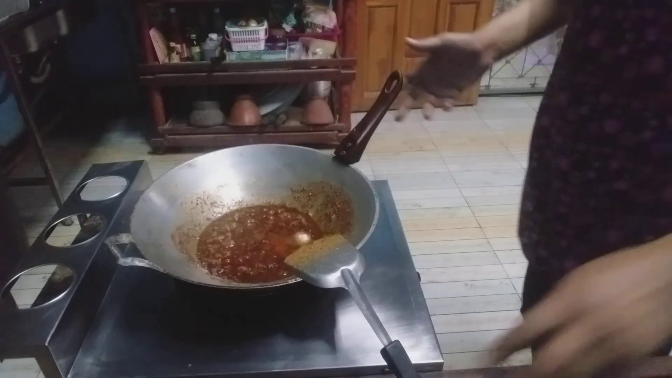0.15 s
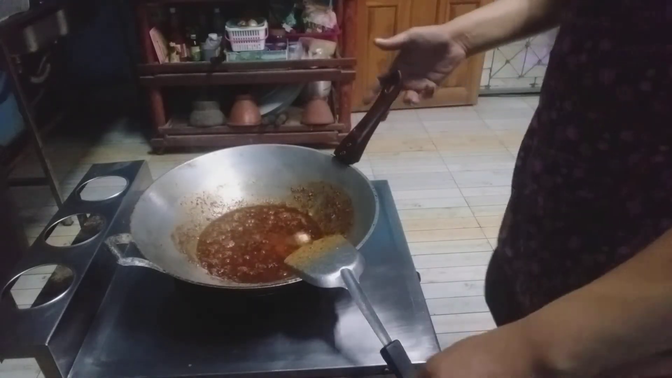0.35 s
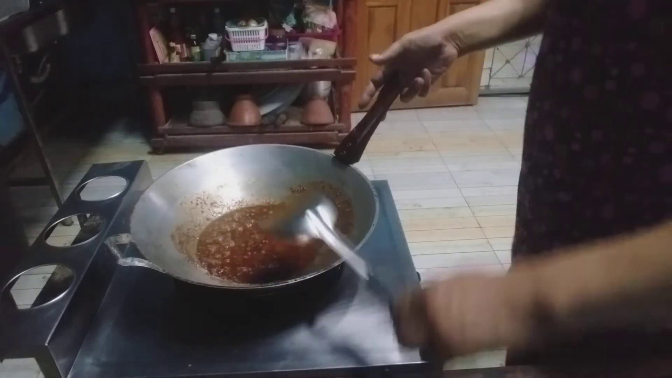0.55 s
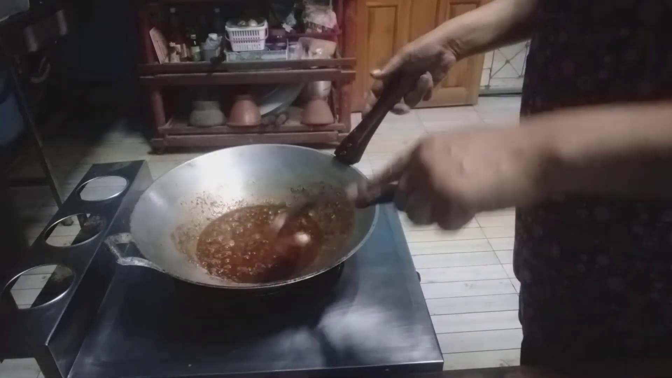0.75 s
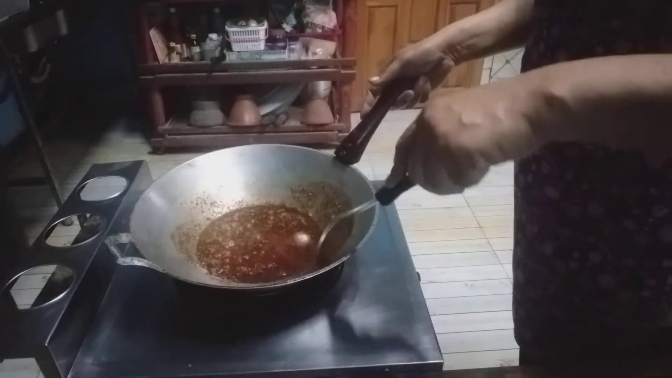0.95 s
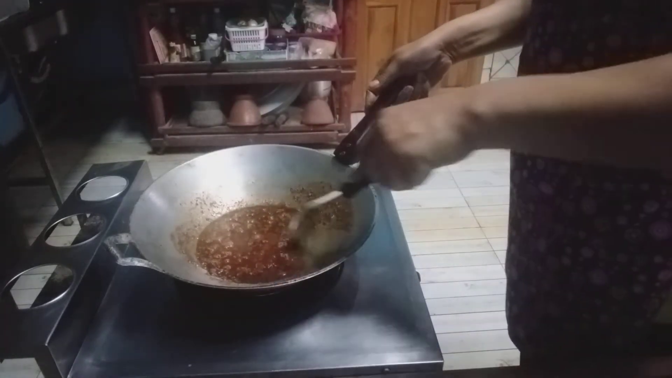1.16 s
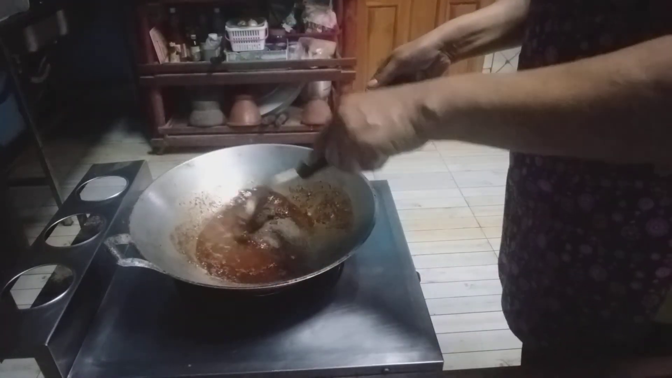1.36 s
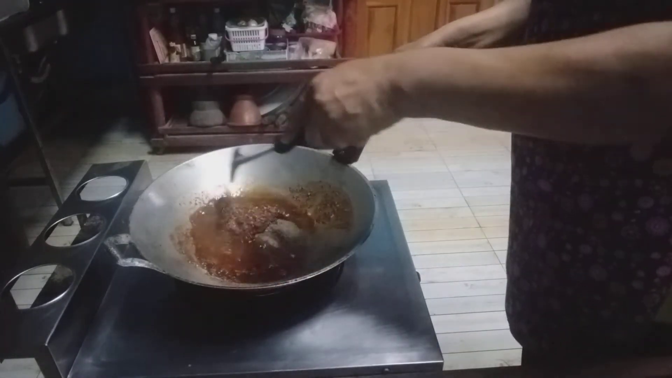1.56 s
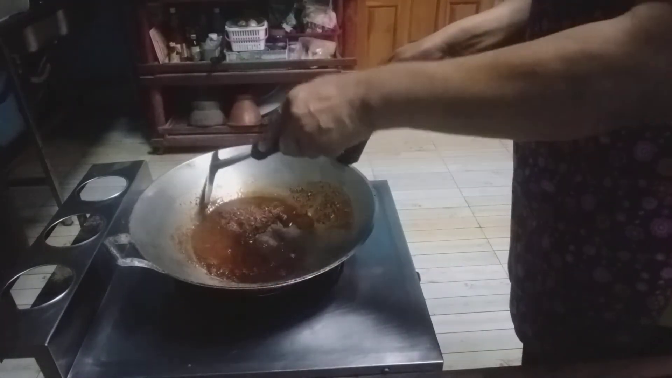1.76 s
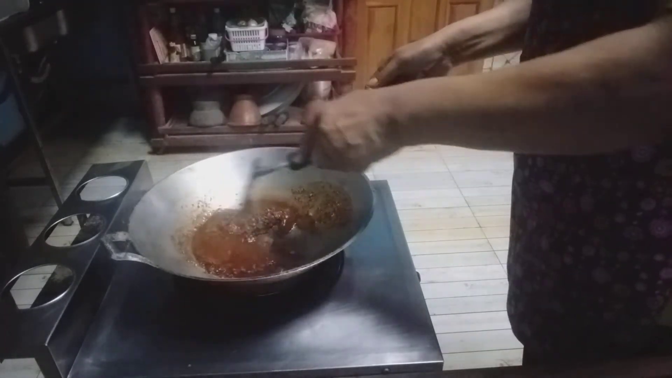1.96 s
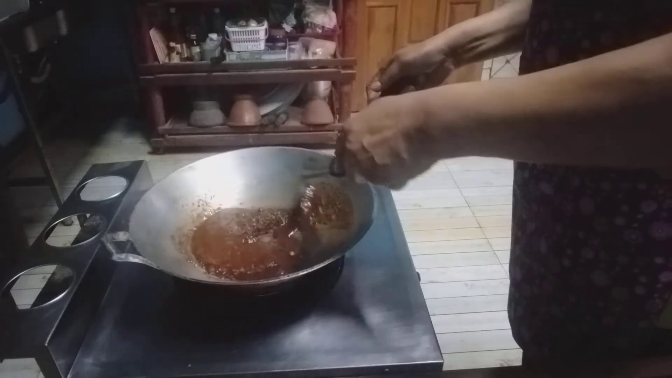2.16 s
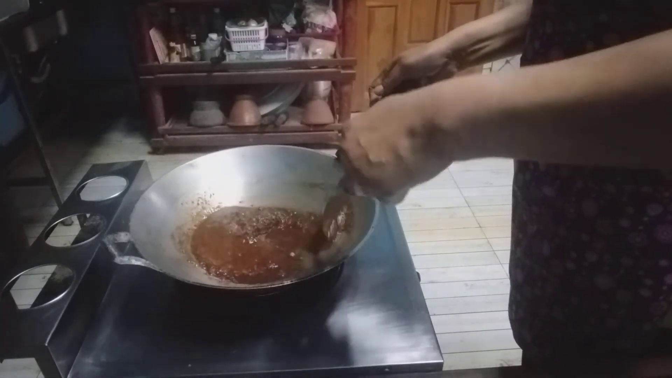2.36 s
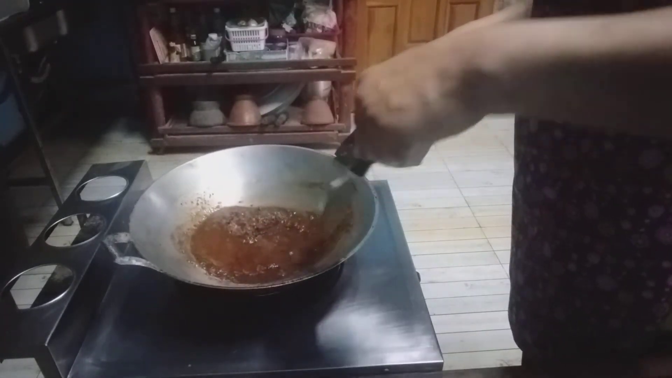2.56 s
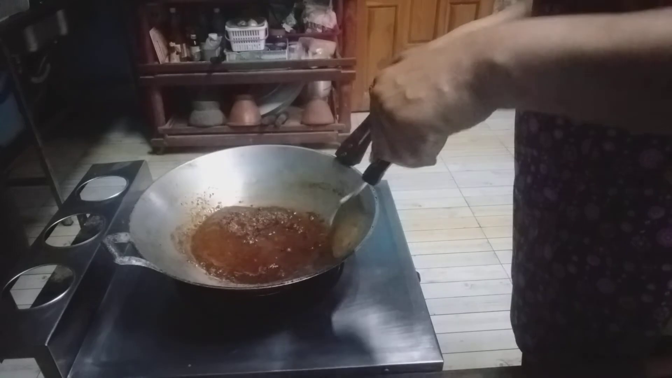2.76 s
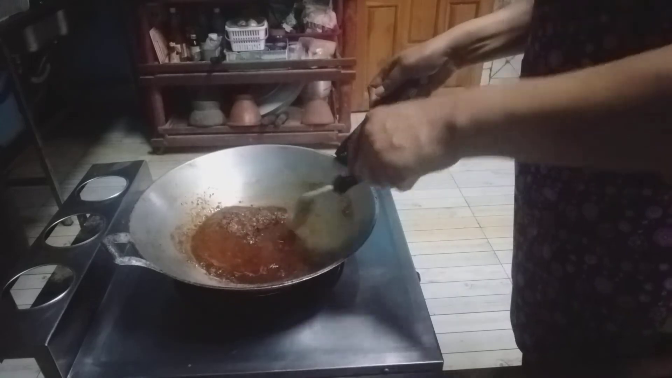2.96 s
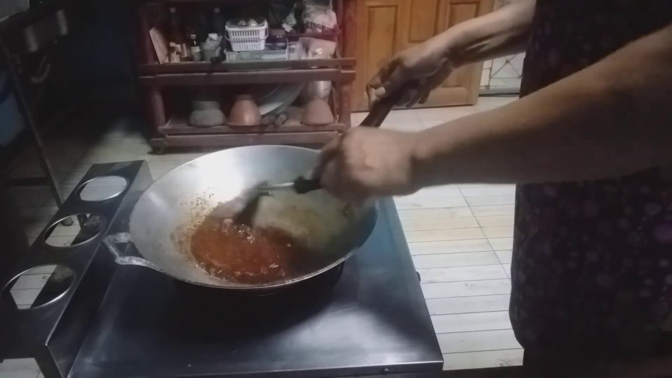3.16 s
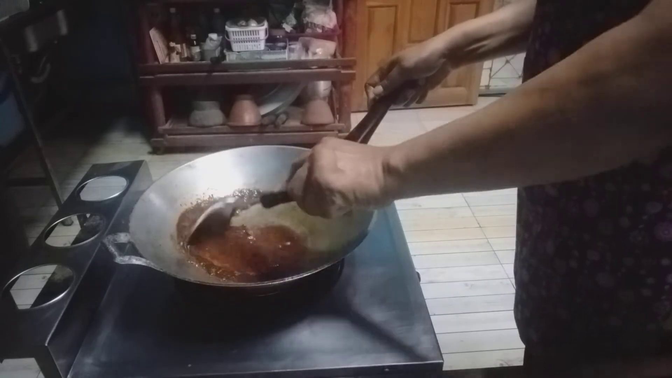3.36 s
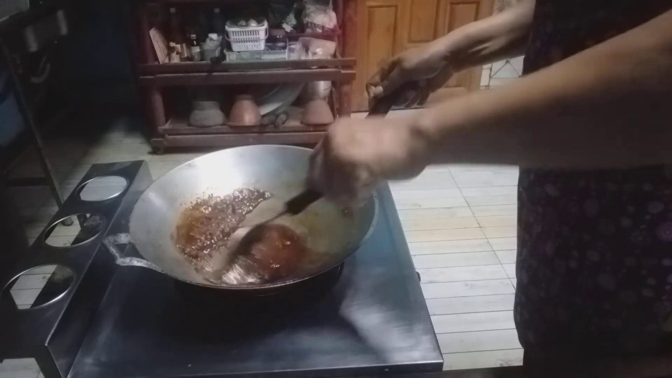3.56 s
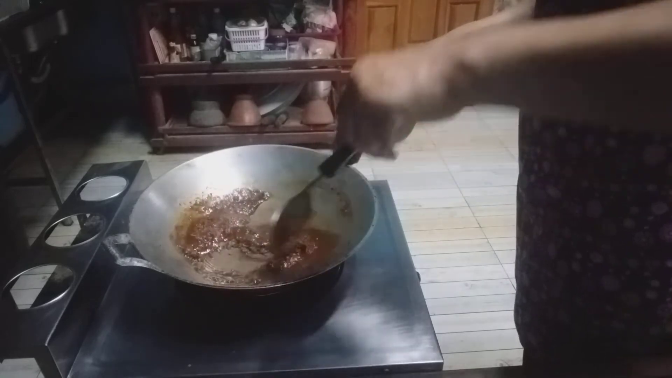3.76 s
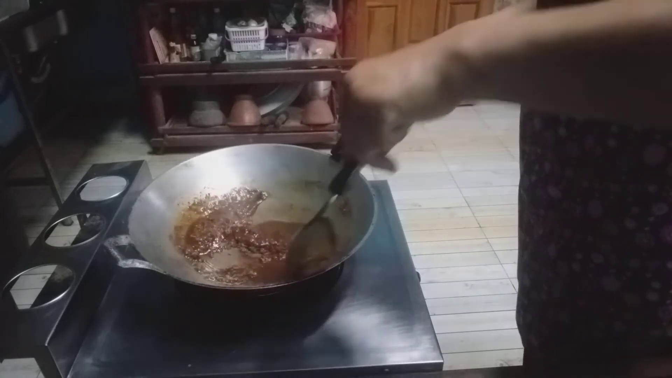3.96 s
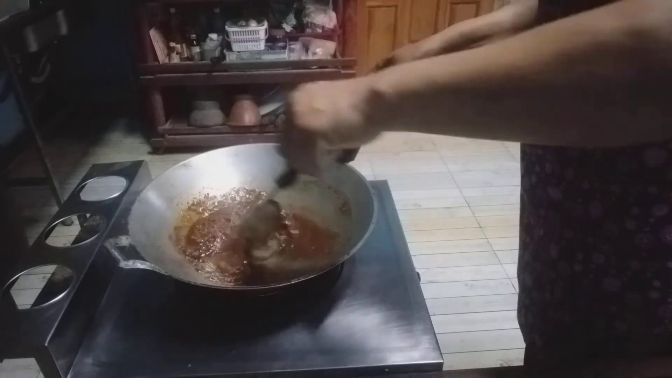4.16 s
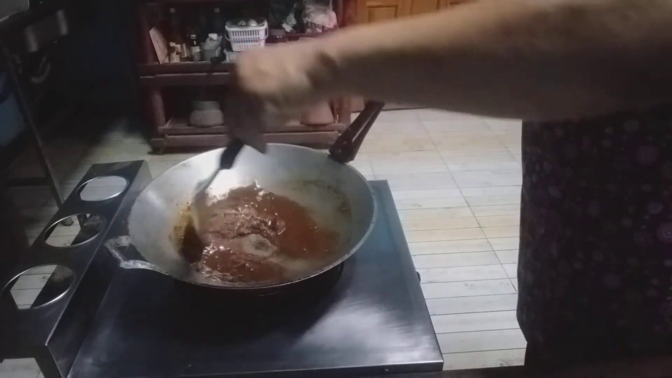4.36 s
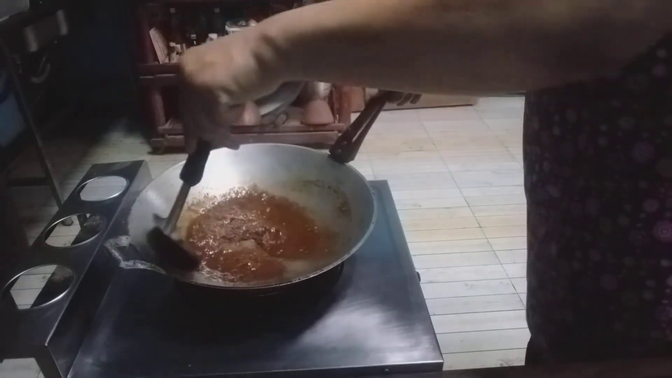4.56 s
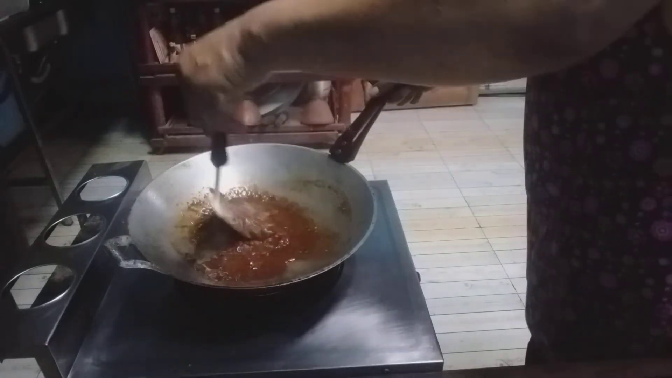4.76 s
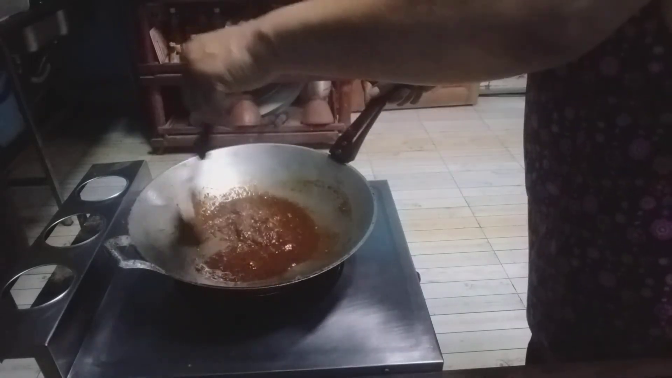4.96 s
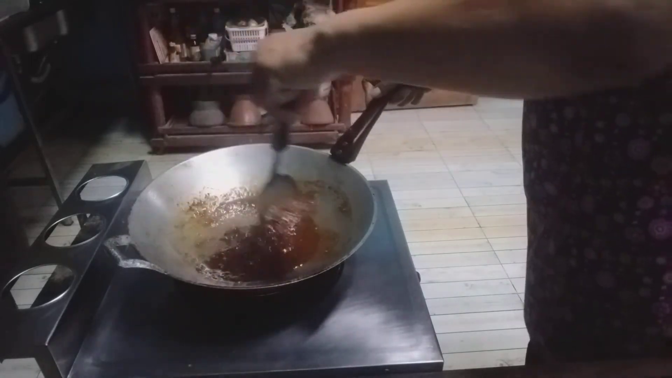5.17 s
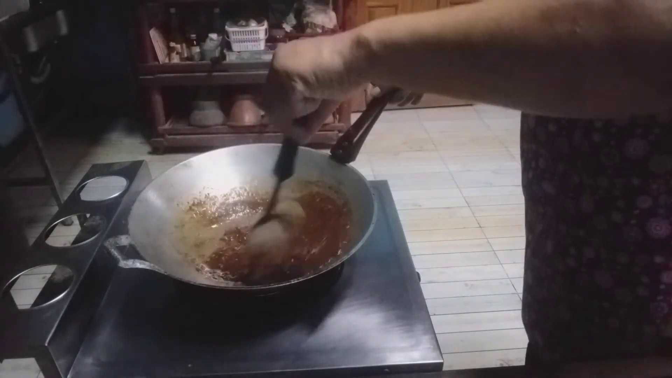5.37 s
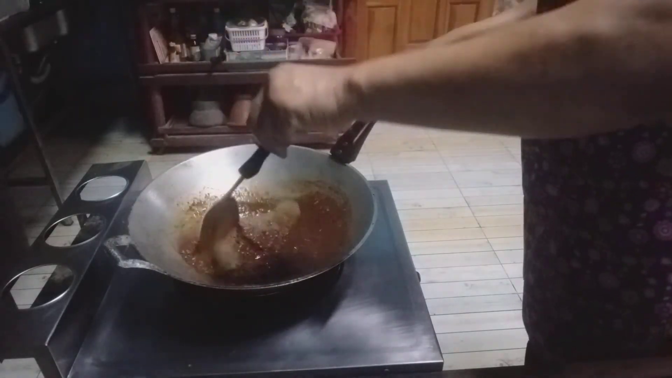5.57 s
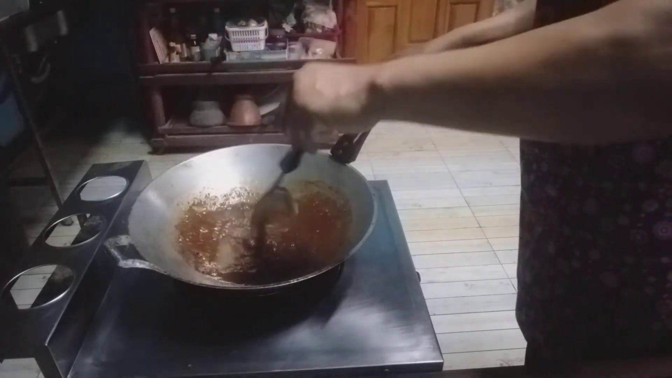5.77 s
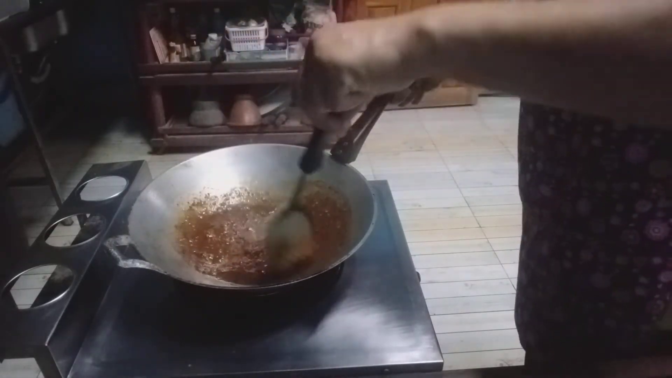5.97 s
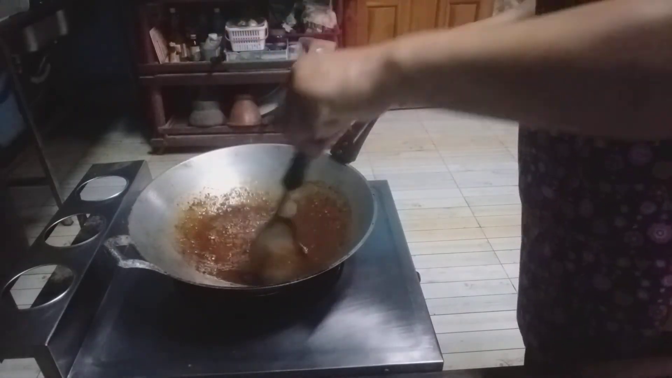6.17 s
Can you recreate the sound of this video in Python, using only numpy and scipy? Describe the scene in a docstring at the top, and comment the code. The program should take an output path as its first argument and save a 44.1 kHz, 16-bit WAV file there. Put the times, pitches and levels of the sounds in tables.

```python
"""A steel spatula knocks and scrapes round a thin wok: each knock rings the metal's own pitches, and
scraping shakes them with a dense stream of tiny slips. Frying sauce sizzles and spits, made of noise
and random clicks. A steady buzzing whistle, probably an insect, is a train of pulses; the stove is
shaped noise. The tiled kitchen echoes the knocks. A mono microphone turns its gain down when the
sound gets loud, then slowly brings it back."""
import sys
import numpy as np
from scipy import signal
from scipy.fft import rfft, irfft
from scipy.io import wavfile
from scipy.ndimage import uniform_filter1d

SR = 44100
rng = np.random.default_rng(int(sys.argv[2]) if len(sys.argv) > 2 else 0)


def waveform_to_disk(signal):
    """Save audio, clipped to [-1, 1], as 16-bit WAV at the path in sys.argv[1]."""
    frames = np.transpose(np.atleast_2d(signal))
    scaled = np.clip(frames, -1, 1) * 32767
    samples = np.round(scaled).astype(np.int16)
    wavfile.write(sys.argv[1], SR, samples)


N = 274166  # length in samples


def amp(db):
    """Turns decibels into a plain multiplier."""
    return 10 ** (np.asarray(db) / 20)


def evened(x):
    """Scales a sound to an average (rms) strength of 1."""
    return x / np.sqrt(np.mean(x ** 2) + 1e-20)


def smooth_noise(size):
    """A slow random wander of average strength 1, smoothed over size samples."""
    return evened(uniform_filter1d(rng.standard_normal(N), size))


def read(points, hz):
    """Reads a table of (pitch, value) at any pitch, evenly in musical steps."""
    f, value = np.transpose(points)
    return np.interp(np.log(hz + 1), np.log(f + 1), value)


def curve(rows):
    """Joins (time, value) points with straight lines over the whole scene."""
    s, value = np.transpose(rows)
    return np.interp(np.arange(N) / SR, s, value)


def add(mix, s, sound):
    """Adds a sound to the mix, starting at s seconds."""
    part = mix[round(s * SR):][:len(sound)]
    part += sound[:len(part)]


# Borders of the four pitch parts: bowl boom, wall clank, blade ring, edge tick. Column: border_hz
PART_EDGES_HZ = [70, 650, 2000, 6900, 15500]


def band(x, part):
    """Keeps one of the four pitch parts."""
    return signal.sosfilt(signal.butter(2, PART_EDGES_HZ[part:part + 2], "band", fs=SR, output="sos"), x)


def part_of_modes(hz):
    """Tells which of the four parts each ringing pitch belongs to."""
    return np.searchsorted(PART_EDGES_HZ, hz[:, 0]) - 1


def coloured(x, points):
    """Makes some pitches of x stronger than others, then evens its strength."""
    gain = amp(read(points, np.fft.rfftfreq(len(x), 1 / SR)))
    return evened(irfft(rfft(x) * gain, len(x)))


def grains(per_s, spread_db):
    """Random clicks, a few of them large."""
    size = np.minimum(rng.exponential(1, N), 3)
    sign = rng.choice([-1., 1.], N)
    happens = rng.random(N) < per_s / SR
    return evened(amp(spread_db * size) * sign * happens)


def dying_noise(points, factor, size):
    """Noise whose low and high pitches die away at their own speeds."""
    hz, t, z = signal.stft(rng.standard_normal(size), SR, nperseg=128)
    t60 = factor * read(points, hz)[:, None]
    return signal.istft(z * amp(-60 * t / t60), SR, nperseg=128)[1][:size]


def resonate(x, hz, width_hz):
    """Rings at a moving pitch: shifts the curve hz down to zero, smooths, and shifts back."""
    turn = np.exp(2j * np.pi * np.cumsum(hz) / SR)
    r = np.exp(-np.pi * width_hz / SR)
    return 2 * (turn * signal.lfilter([1 - r], [1, -r], x / turn)).real


# Tone of the hush of burner and room. Columns: pitch_hz, level_db (relative, per Hz)
HUSH_TONE = [(88, -52), (150, -37), (330, -20), (473, -15), (643, -19), (1000, -17), (1770, -14.5),
             (2170, -15), (2620, -21.5), (5860, -16), (9000, -33.5), (11700, -59), (19800, -120)]
# How strongly the stove drones, before booms shake it. Columns: time_s, level_db
DRONE = [(0, -57), (0.8, -58.5), (2.0, -67), (4.0, -59.5), (5.5, -65.5), (6.22, -59)]


def stove():
    """Broad hush of flame and room over a low drone that each boom of the bowl shakes up."""
    drone_tone = [(40, -32), (55, 5.0), (75, -7), (100, 6.5), (130, -7.0), (200, -55)]  # (Hz, dB)
    drone = coloured(rng.standard_normal(N), drone_tone)
    level = amp(curve(DRONE))
    t = np.arange(SR // 2) / SR
    shake_under_bowl_db, shake_t60_s = -19, 0.48
    for s, bowl_db, *_ in KNOCKS:
        shake_db = bowl_db + shake_under_bowl_db - 60 * t / shake_t60_s
        add(level, s, amp(shake_db) * np.minimum(t / 0.01, 1))
    hush = amp(-48) * coloured(rng.standard_normal(N), HUSH_TONE)
    return hush + level * drone


# How long the tiled room echoes, before a small shortening.
# Columns: pitch_hz, fade_s (time to fall by 60 dB)
ROOM = [(100, 0.37), (1000, 0.54), (4000, 0.46), (12000, 0.56)]


def kitchen(x):
    """Blurred echo tail of the tiled room, starting after a few thousandths of a second."""
    tail = np.concatenate([np.zeros(200), dying_noise(ROOM, 0.96, SR // 2)])
    return signal.oaconvolve(x, tail / np.linalg.norm(tail))[:N]


def buzz():
    """Uneven wing strokes, with some hiss, ring one narrow resonance."""
    buzz_hz, strokes_per_s, buzz_db = 2200, 92, -39.5
    speed = strokes_per_s * (1 + 0.00412 * smooth_noise(6000))  # the stroke rate wanders slightly
    strokes = np.diff(np.floor(np.cumsum(speed) / SR), prepend=0)  # 1 wherever a new stroke begins
    strength = amp(0.54 * smooth_noise(500))
    drive = evened(strokes * strength) + amp(5) * rng.standard_normal(N)
    t = np.arange(-400, 401) / SR
    pulse = np.exp(-(t / 0.0026) ** 2) * np.sin(2 * np.pi * buzz_hz * t)
    side = amp(-21.5) * np.exp(-(t / 0.005) ** 2) * np.sin(2 * np.pi * 1930 * t)  # a weak lower partner
    return amp(buzz_db) * evened(signal.oaconvolve(drive, pulse + side, "same"))


# How strongly the sauce sizzles, before flurries and a small lift. Columns: time_s, level_db
SIZZLE = [(0.0, -52.5), (0.95, -51), (1.12, -42), (1.94, -41), (2.4, -38.5), (2.58, -42), (3.44, -46),
          (3.69, -39.5), (4.23, -36.5), (4.66, -34.5), (4.79, -39.5), (4.99, -39.5), (5.25, -50.5),
          (5.52, -36.5), (5.87, -40.5), (6.22, -39.5)]
# Tone of the bursting bubbles. Columns: pitch_hz, level_db (relative, per Hz)
FIZZ = [(1470, -20), (2500, -7.5), (4800, -0.5), (6300, -4.5), (8200, 1.5), (8940, -7), (9890, -5.5),
        (13200, -3.5), (15200, -7), (16000, -6.5)]
# Large spits of oil. Columns: start_s, peak_db
SPITS = [(0.2837, -31), (1.851, -22), (1.906, -22.5), (1.942, -23), (2.3945, -31), (3.31, -28.5),
         (3.451, -24), (3.769, -17.5), (4.0062, -27), (4.621, -15.5), (4.705, -20), (4.843, -21.5),
         (5.111, -24), (5.2586, -23)]


def sizzle():
    """Steam bubbles burst in the oil as hiss and dense clicks, in flurries; a few spit loudly."""
    flurry_db = 1.2 * smooth_noise(400) + 1.3 * smooth_noise(1800)
    bubbles = rng.standard_normal(N) + amp(-7.5) * grains(per_s=1100, spread_db=12.0)
    hz, t, z = signal.stft(bubbles, SR, nperseg=512)
    # bubble sizes drift, so patches of pitch and time grow stronger or weaker
    patches = uniform_filter1d(rng.standard_normal(z.shape), 4, 0)
    patches = evened(uniform_filter1d(patches, 8, 1))
    fine = coloured(signal.istft(z * amp(2.0 * patches), SR, nperseg=512)[1][:N], FIZZ)
    out = amp(curve(SIZZLE) + flurry_db + 0.5) * fine
    t = np.arange(3000) / SR
    for s, peak_db in SPITS:
        fade = np.exp(-t / 0.0021) + 0.48 * np.exp(-t / 0.032)  # a sharp burst, then a softer puff
        puff = coloured(rng.standard_normal(len(t)), FIZZ) * fade
        add(out, s, amp(peak_db) * puff / abs(puff).max())
    return out


def stroke_shape(length_s):
    """A scooping stroke rises from 0 to 1 just past its middle, then falls back."""
    return np.interp(np.linspace(0, 1, round(length_s * SR)), [0, 0.57, 1], [0, 1, 0])


# Ringing pitches (modes) of wok and blade, also used by knock(), before each use adjusts them.
# Columns: pitch_hz, level_db (relative), fade_s (time to fall by 60 dB)
WOK = [(100, -17, .35), (190, -8, .35), (260, 0, .45), (404, -3, .45), (495, -3, .4), (620, -8, .35),
       (790, 0, .4), (900, -4, .35), (1077, -8, .35), (1233, 0, .4), (1405, -5, .3), (1680, -2, .35),
       (3085, -11, .12), (3644, -7, .3), (3790, -1, .3), (3881, -5, .28), (4118, -6, .24), (4334, -6, .24),
       (4522, -3, .26), (4660, -8, .22), (4904, -11, .18), (5265, -6, .14), (5612, -6, .17),
       (5900, -9, .13), (6228, -12, .15), (6654, -10, .15), (7704, -3, .12), (8000, -3, .12),
       (8409, -2, .12), (8684, -3, .12)]
# How hard the blade is dragged along the steel. Columns: time_s, pressure_db
SCRAPE = [(0.0, -57), (1.05, -52), (1.16, -41), (1.25, -35.5), (1.42, -52), (1.95, -43.5), (2.3, -41),
          (2.6, -41), (2.82, -39.5), (3.29, -41), (3.57, -40), (3.9, -51), (4.07, -38.5), (4.38, -44),
          (4.61, -40.5), (5.11, -39), (5.3, -41.5), (5.64, -39.5), (5.83, -42), (6.22, -44)]
# How bowl rumble, wall grind and blade rasp follow the pressure, one row each.
# Columns: firm_level_db (at firm pressure), follow_db_per_db (rise for each dB of pressure)
FOLLOW = [(-58, 0.19), (-48.5, 1.32), (-40.5, 2.5)]
# Scooping strokes; the hollow between blade and wall sings.
# Columns: start_s, length_s, peak_level_db, first_pitch_hz, last_pitch_hz
STROKES = [(1.063, 0.21, -38.5, 394, 550), (1.21, 0.093, -34.5, 890, 880), (2.85, 0.28, -43.5, 440, 584),
           (3.114, 0.15, -47.5, 970, 930), (3.975, 0.24, -38.5, 400, 775), (5.057, .12, -40.5, 624, 1040),
           (5.615, .15, -43.5, 640, 684)]


def scrape():
    """Dense slips of the blade shake the wok's modes, damped by sauce and contact."""
    firm_pressure_db, stroke_ends_db, stroke_grind_db = -40, -12.5, 5.5
    judder_db = 2.0 * smooth_noise(1100)  # the blade catches and lets go
    slips = amp(judder_db) * grains(per_s=3000, spread_db=3.0)
    hz, db, t60 = np.transpose(WOK)[:, :, None]
    t = np.arange(4000) / SR
    modes = amp(db - 60 * t / (0.32 * t60)) * np.sin(2 * np.pi * hz * t)
    part_of = part_of_modes(hz)
    out, lift_db = np.zeros(N), np.zeros((3, N))
    for s, length_s, *_ in STROKES:
        add(lift_db[1], s, stroke_grind_db * stroke_shape(length_s))  # strokes grind the wall harder

    over_firm_db = curve(SCRAPE) - firm_pressure_db
    for part, ((firm_db, share), ring_db) in enumerate(zip(FOLLOW, (-3, -6, -8))):
        level_db = firm_db + share * over_firm_db + lift_db[part]
        ring = evened(signal.oaconvolve(slips, modes[part_of == part].sum(0))[:N])
        rough = evened(band(slips, part))
        out += amp(level_db) * evened(amp(ring_db) * ring + rough)

    for s, length_s, peak_db, first_hz, last_hz in STROKES:
        level_db = peak_db + stroke_ends_db * (1 - stroke_shape(length_s))
        during = slice(round(s * SR), round(s * SR) + len(level_db))
        hollow_hz = np.geomspace(first_hz, last_hz, len(level_db))
        hollow = resonate(resonate(slips[during], hollow_hz, 160), hollow_hz, 160)
        out[during] += amp(level_db) * evened(hollow) * signal.windows.tukey(len(hollow), .4)
    return out


# Fading of the clatter: modes too crowded to tell apart, before each knock's ring length factor.
# Columns: pitch_hz, fade_s (time to fall by 60 dB)
CLATTER = [(80, 0.19), (400, 0.84), (1500, 0.53), (4000, 0.7), (8000, 0.27), (15000, 0.34)]
# Tone of the clatter. Columns: pitch_hz, level_db (relative, per Hz)
CLANG = [(70, -32), (250, -13), (350, -16.5), (670, -15.5), (1230, -12), (2000, -10.5), (2900, -10),
         (3700, 1), (4600, 1.5), (5100, -0.5), (5600, 1), (6500, -7), (9000, -19), (15500, -7)]
# Tone of the snap of first contact. Columns: pitch_hz, level_db (relative, per Hz)
SNAP = [(300, -30), (1000, -4), (1600, -1), (2600, -4), (4200, -21), (8000, -6), (15000, -11)]


def knock(snap_db, levels_db, favoured_hz, bowl_length, length):
    """The spot struck favours the modes near one pitch in each part; bass swells more slowly than treble."""
    hz, db, t60 = np.repeat(WOK, 3, axis=0).T[:, :, None]  # dents split each mode into close neighbours
    split, spot_db, phase = rng.standard_normal((len(hz), 3)).T[:, :, None]
    part_of = part_of_modes(hz)
    t = np.arange(round(.3 * SR)) / SR
    snap = coloured(rng.standard_normal(len(t)), SNAP) * np.exp(-t / 0.00083)
    out = amp(snap_db) * snap / abs(snap).max()

    # one value for each of bowl, wall, blade and edge
    centres_hz = (*favoured_hz, 9000)
    lengths = (bowl_length, length, length, length)
    clatter_db = (0.5, 3.5, -1, 6.5)  # clatter against the modes
    rises_s = (0.0023, 0.00034, 0.00037, 0.00036)
    most_favour_db = (10.6, 23.0, 9.1, 1)  # limit on how far distant modes are weakened
    for part, (level_db, dense_db, rise_s) in enumerate(zip(levels_db, clatter_db, rises_s)):
        own, centre, lasts = part_of == part, centres_hz[part], lengths[part]
        octaves_away = abs(np.log2(hz[own] / centre))
        near_db = -np.minimum(60 * octaves_away, most_favour_db[part])
        mode_hz = hz[own] * (1 + 0.0051 * split[own])
        waves = np.sin(2 * np.pi * (mode_hz * t + phase[own]), dtype="f4")
        fade = np.exp(-np.log(1000) * t / (lasts * t60[own]), dtype="f4")
        modes = amp(db[own] + near_db + 3.1 * spot_db[own])[:, 0] @ (waves * fade)

        clatter = band(dying_noise(CLATTER, lasts, len(t)), part)
        lean = [(centre / 1.6, -7), (centre, 0), (centre * 1.6, -11)]  # clatter favours that pitch too
        ring = evened(modes) + amp(dense_db) * coloured(coloured(clatter, CLANG), lean)
        ring = ring * (1 - np.exp(-t / rise_s))
        loudest = np.sqrt(uniform_filter1d(ring ** 2, 300).max())
        out += amp(level_db) * ring / loudest
    return out * np.minimum((t[-1] - t) / 0.032, 1)  # fade the very end to silence


# Knocks of the spatula. Columns: start_s, bowl_boom_level_db, wall_clank_level_db,
# blade_ring_level_db, edge_tick_level_db, bowl_pitch_hz, wall_pitch_hz, blade_pitch_hz (favoured
# pitches), ring_length (factor, no unit)
KNOCKS = [(0.361, -40, -51, -53, -44.5, 258, 645, 3600, 0.22),
          (0.928, -42, -23.5, -12, -16.5, 260, 1450, 5400, 0.83),
          (0.937, -37, -33.5, -11, -19, 405, 1230, 4550, 0.8),
          (0.954, -28.5, -28, -7, -11.5, 258, 1240, 3790, 0.57),
          (1.235, -46, -26.5, -29, -69, 368, 840, 3960, 0.51),
          (1.247, -48, -37, -36.5, -55, 504, 1720, 3300, 0.26),
          (1.778, -39, -26, -26, -35, 278, 1065, 4100, 0.11),
          (2.16, -49, -39.5, -58, -40, 374, 720, 3630, 0.4),
          (2.26, -24.5, -27.5, -34, -33, 255, 800, 4500, 0.31),
          (2.639, -34.5, -32, -26, -37, 310, 1180, 4200, 0.23),
          (2.741, -49, -46, -32, -38, 202, 1810, 4260, 0.84),
          (2.869, -49.5, -47, -33.5, -33.5, 430, 1390, 4550, 0.52),
          (3.014, -41, -41.5, -41, -37.5, 524, 920, 4680, 1),
          (3.484, -33.5, -33.5, -45, -46, 245, 770, 4040, 0.54),
          (3.898, -32.5, -31, -31, -35, 403, 910, 4000, 0.4),
          (4.094, -44.5, -35.5, -32.5, -35, 442, 780, 3950, 0.8),
          (4.488, -44, -32, -24.5, -24.5, 273, 1310, 4230, 0.36),
          (4.565, -53.5, -41, -35, -31.5, 264, 1780, 3950, 0.69),
          (4.886, -53.5, -34, -25, -26, 460, 1680, 4200, 0.21),
          (5.053, -37, -37, -52, -34, 310, 765, 3660, 0.25),
          (5.114, -53, -52, -51, -33.5, 305, 910, 3640, 1),
          (5.704, -47, -41, -42, -37, 430, 720, 3650, 0.35),
          (6.014, -32.5, -26.5, -22.5, -37, 294, 1670, 4140, 0.42)]


def spatula_knocks():
    """Places every knock; first contact follows the wall clank, bowl ringing follows ring length partly."""
    hits = np.zeros(N)
    snap_over_wall_db = 10
    for s, *levels_db, bowl_hz, wall_hz, blade_hz, length in KNOCKS:
        snap_db = levels_db[1] + snap_over_wall_db
        bowl_length = 0.89 + 0.29 * length
        add(hits, s, knock(snap_db, levels_db, (bowl_hz, wall_hz, blade_hz), bowl_length, length))
    return hits


def scene():
    """Mixes all the sounds, the same in both channels; only the knocks echo in the kitchen."""
    hits = spatula_knocks()
    mix = stove() + amp(-8) * kitchen(hits) + buzz() + sizzle() + scrape() + hits
    return np.array([mix, mix])


def record(dry):
    """Gain drops when the sound is loud and creeps back; then bass cut, soft overload and treble limit."""
    power_db = 10 * np.log10(abs(uniform_filter1d((dry ** 2).mean(0), 2000)) + 1e-12)
    recovered_db = np.arange(N) * 5.16 / SR  # 5.16 dB a second
    excess_db = .5 * (power_db + 27)  # half of what is above -27 dB
    over_db = np.maximum(np.maximum.accumulate(excess_db + recovered_db) - recovered_db, 0)
    late = np.exp(-1 / (.08 * SR))  # the gain follows with a lag of 0.08 s
    ducked = dry / amp(signal.lfilter([1 - late], [1, -late], over_db))
    ducked = signal.sosfilt(signal.butter(6, 47, "high", fs=SR, output="sos"), ducked)
    treble_limit = signal.firwin(511, 15880, window=("kaiser", 9), fs=SR)  # removes what is above 15880 Hz
    return signal.oaconvolve(np.tanh(ducked), treble_limit[None], "same")


dry = scene()
out = record(dry)
waveform_to_disk(out)
```